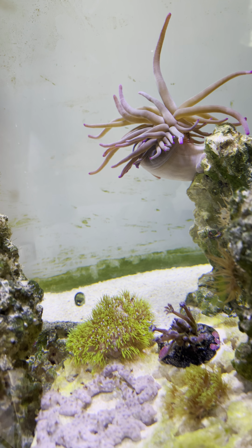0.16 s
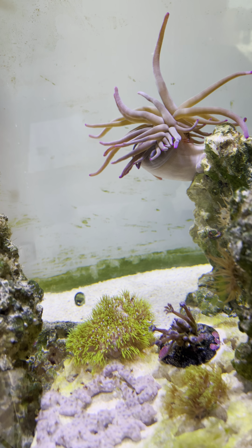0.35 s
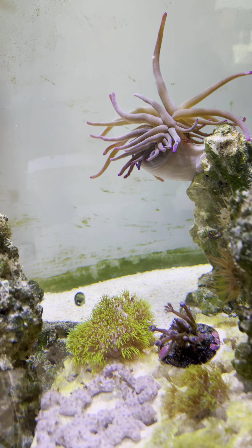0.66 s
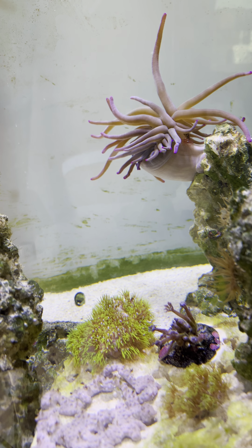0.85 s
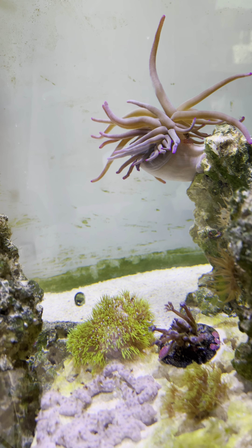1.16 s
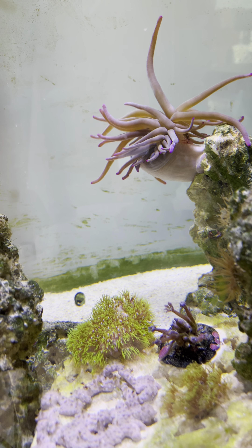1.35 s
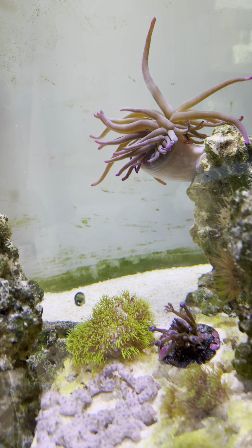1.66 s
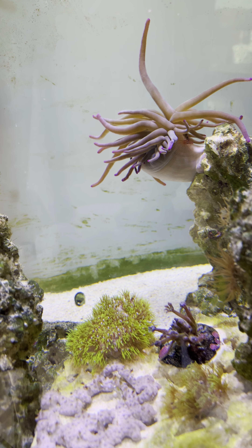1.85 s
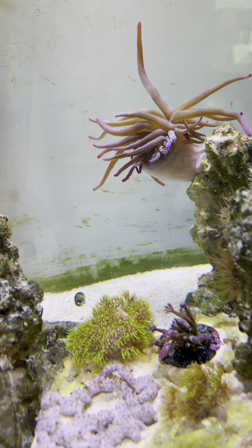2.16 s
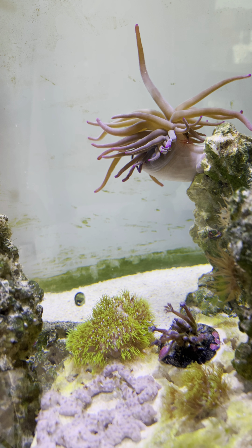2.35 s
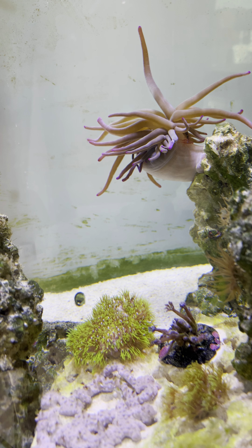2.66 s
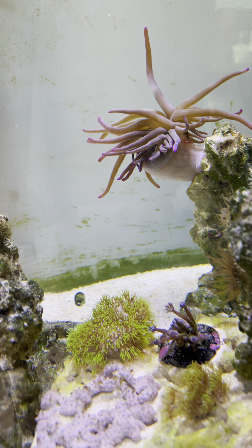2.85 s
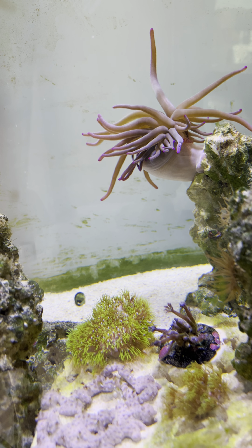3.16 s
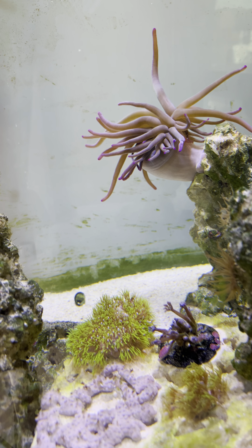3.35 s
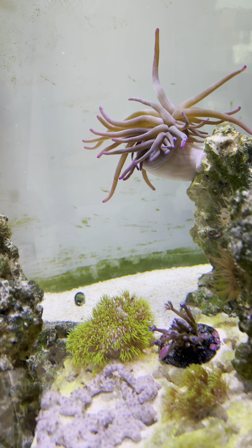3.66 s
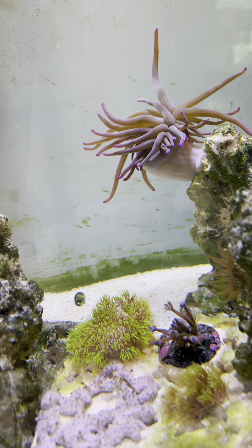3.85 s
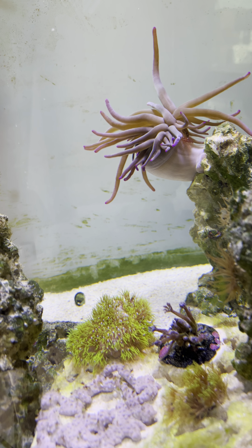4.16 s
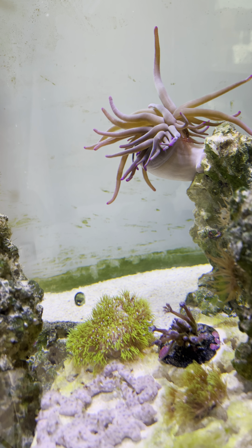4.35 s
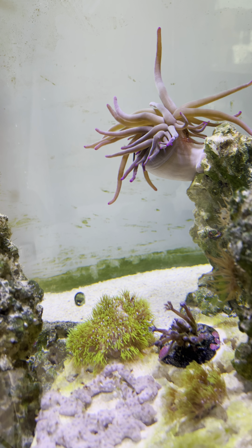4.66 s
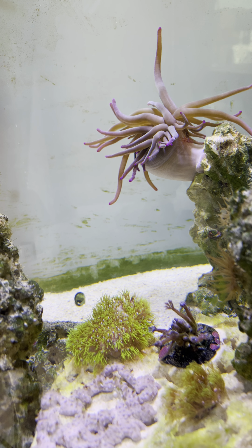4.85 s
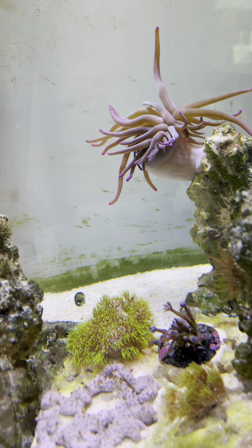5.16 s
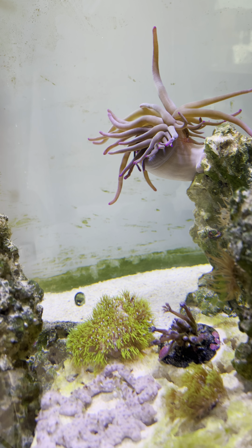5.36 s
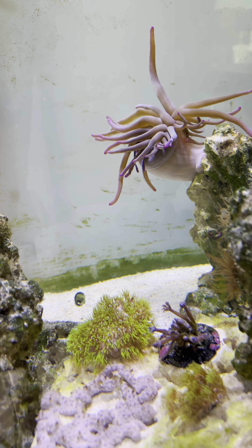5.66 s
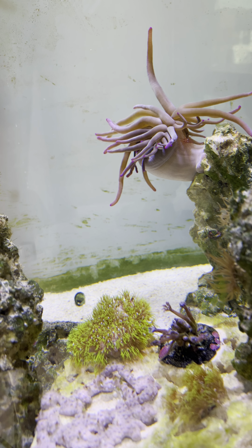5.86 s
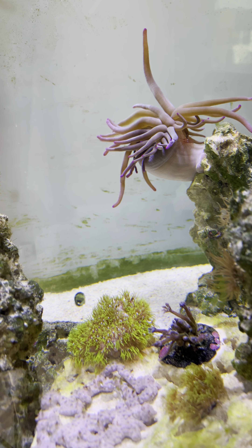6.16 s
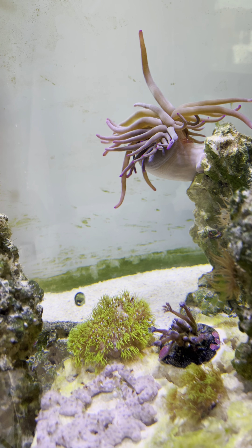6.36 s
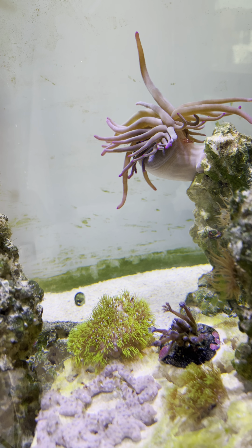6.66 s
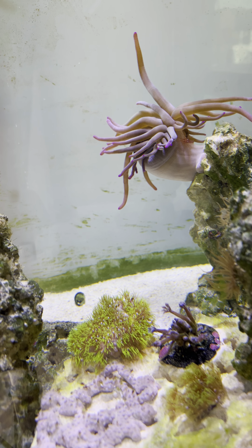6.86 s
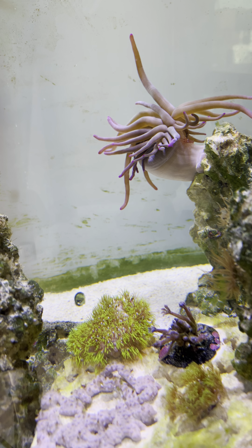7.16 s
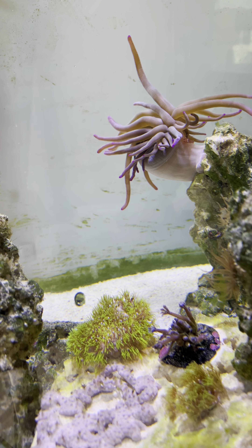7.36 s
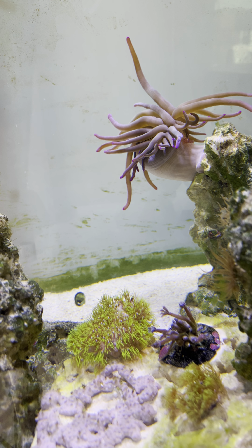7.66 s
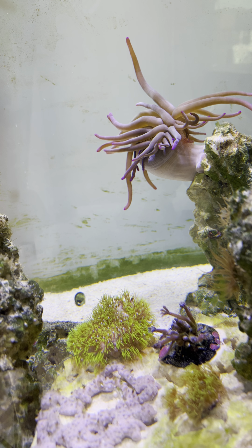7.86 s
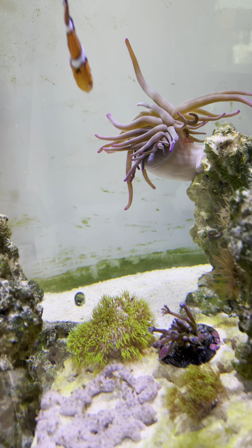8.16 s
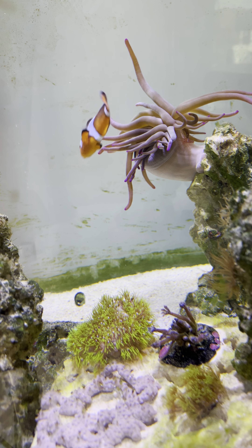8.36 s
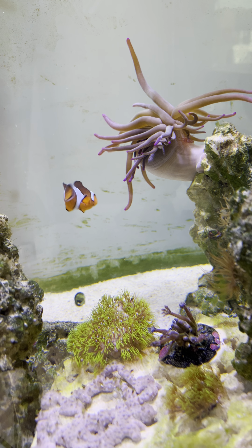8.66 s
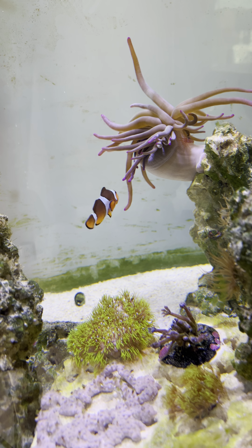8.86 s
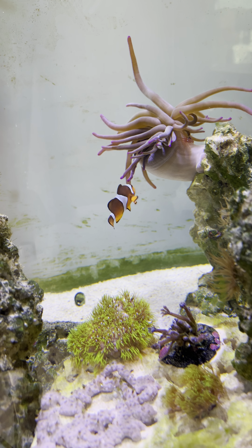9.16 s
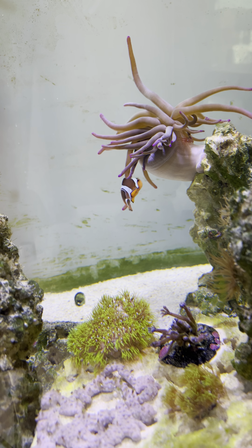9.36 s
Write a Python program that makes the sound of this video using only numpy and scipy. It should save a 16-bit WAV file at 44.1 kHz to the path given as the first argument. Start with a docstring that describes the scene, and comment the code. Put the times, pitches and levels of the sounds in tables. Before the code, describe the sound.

A home aquarium is heard close to the glass in a small room. For the whole stretch of nearly ten seconds, a pump gives a steady low hum over softly churning water, while the return flow trickles with tiny high bubbles and a faint fizz. A quiet, deep drone climbs in pitch and fades within the first two seconds. Sleeves rustle softly on and off, with a faint thin squeak at 0.8 seconds. Light clicks come at about 1.2, 2.2 and 3.6 seconds, the middle one duller. At 5 seconds the cabinet takes one dull thump, the loudest event, and its panels ring low for about half a second. From around 7 seconds the sleeves stir again in soft swishes, and a small, lower bubble plips near 8.3 seconds. The hum and trickle continue to the end.

```python
"""A home aquarium, close to the glass. From the outset the pump hums at twice the mains frequency and
churns the water, while the return flow trickles with tiny ringing bubbles. A low drone climbs and fades
in the first seconds. Sleeves rustle on and off as cloth slides on cloth, with a thin squeak at 0.8 s
and a few light clicks in the small room. At 5 s the cabinet takes one dull thump and its panels ring;
from about 7 s the sleeves stir again over the hum and the water."""
import sys
import numpy as np
from scipy import signal
from scipy.fft import rfft, irfft
from scipy.io import wavfile
from scipy.ndimage import uniform_filter1d

SR = 44100
rng = np.random.default_rng(int(sys.argv[2]) if len(sys.argv) > 2 else 0)


def transcribe(u):
    """Save the signal u as a 16-bit wav file named by the first command-line argument.

    u: samples, shape (n,) or (channels, n), limited to [-1, 1]; the rate is SR.
    q: integer samples, one column per channel.
    """
    v = np.clip(np.atleast_2d(u).T, -1, 1)
    q = np.round(v * 32767).astype(np.int16)
    wavfile.write(sys.argv[1], SR, q)


N = 419391
T = np.arange(N) / SR
FREQ = np.maximum(np.arange(N // 2 + 1) * SR / N, 1)

# stereo image: f/Hz, correlation, left phase lag/rad
STEREO_IMAGE = [(120, .999, 0), (250, .95, 0), (450, .5, 0), (800, .33, 0), (1700, .55, 0), (2800, .25, .4),
                (4500, .3, .2), (5800, .6, 1.1), (7500, .68, .9), (9000, .9, 1.2), (12000, .82, 1.3),
                (15500, .82, 1.55)]
# tone of the cloth hiss: f/Hz, relative level/dB
CLOTH_EQ = [(400, -25), (1200, -6), (2600, 1.5), (3800, 0), (5300, -1.5), (6600, 1), (9000, -2),
            (10300, -5), (12000, -22.5), (15500, -11.5)]
# short swells of hiss, mostly cloth strokes, plus a click's bright tail and a brief burst at the very end: #
# start t/s, length/s, relative level/dB
HISS_SWELLS = [(0.241, 0.031, -55.5), (0.89, 0.11, -55.5), (1.096, .2, -59.5), (1.207, 0.24, -57),
               (1.75, .2, -63), (1.95, .05, -53.5), (1.99, 0.33, -55), (2.206, .12, -54.5), (2.3, .2, -63),
               (2.69, 0.37, -60), (3.32, .3, -60), (3.531, 0.13, -53.5), (3.644, 0.066, -46.5),
               (4.08, 0.17, -58), (4.325, 0.11, -63), (4.674, 0.085, -50.5), (4.88, .3, -65),
               (5.02, 0.04, -52), (6.935, .08, -61.5), (6.9, 0.66, -69), (7.443, 0.31, -51.5),
               (7.65, 0.19, -55), (8.03, .36, -64.5), (8.427, 0.18, -59.5), (8.636, 0.15, -56.5),
               (8.974, .2, -57.5), (9.2, 0.13, -63), (9.464, 0.13, -56.5)]
# stretches of faint shifting between strokes: start t/s, end t/s
RESTLESS_SPANS = [(.85, 4.47), (7.4, 8.85)]
# duller brushes of cloth: centre t/s, length/s, level/dB, low f/Hz, high f/Hz
DULL_BRUSHES = [(0.98, 0.027, -55, 700, 3800), (2.066, 0.082, -60, 1300, 3800),
                (2.266, 0.38, -57, 650, 3300), (2.866, 0.28, -61, 800, 3500), (3.544, 0.3, -64, 1500, 4200),
                (7.563, 0.19, -65, 2200, 4500), (8.191, 0.07, -58.5, 2390, 4570),
                (8.213, .06, -58, 450, 1050), (8.313, 0.13, -56, 550, 2630)]
# resonances of the squeak: f/Hz, width/Hz, relative level/dB
SQUEAK_PEAKS = [(6400, 310, -5.5), (7040, 250, -5), (8000, 300, -9), (8760, 220, 1.5), (13600, 700, -16),
                (15100, 830, -19)]
# light contacts, and the sharp onset of the cabinet thump near 5.03 s: t/s, relative level/dB, low f/Hz, # high
# f/Hz, burst length/s, room send/dB
CLICK_CUES = [(.392, -60, 2500, 7500, .018, -7), (.475, -58.5, 1210, 4970, .025, 2),
              (.974, -57, 756, 3000, .012, -6), (1.2312, -34.5, 2060, 15500, 0.0052, -0.5),
              (1.237, -41.5, 5480, 10500, 0.022, -6), (1.236, -48.5, 2000, 3020, 0.037, -3),
              (2.196, -40, 690, 2020, 0.019, -2), (2.2115, -42, 700, 1800, 0.01, -14),
              (3.649, -38.5, 7350, 10100, 0.013, 2), (3.653, -42, 3270, 9600, 0.05, -4.5),
              (3.654, -45, 650, 1030, 0.034, 2.5), (3.664, -47, 2630, 4400, 0.028, 2.5),
              (5.029, -35.5, 440, 763, 0.024, 1.5), (5.0287, -40.5, 700, 1920, 0.0098, 2.5),
              (5.041, -41.5, 856, 1340, 0.011, 1.5), (5.04, -58, 1600, 7300, 0.041, -6)]
# cabinet modes under a blow: f/Hz, relative level/dB, t60/s
PANEL_MODES = [(69.7, -9, 0.67), (88, -17, 0.62), (124, -12, 0.22), (143.6, 4.5, 0.29), (154.6, 6, 0.2),
               (203, -6, 0.48), (264, -7.5, 0.25), (280, -13, 0.29), (353.5, -13.5, 0.23),
               (374, -11.5, 0.2), (535, -21, 0.21), (650, -21, 0.18)]
# low body of the churning water: f/Hz, density/(dB per Hz)
CHURN_EQ = [(20, -101), (35, -74.5), (60, -64.5), (78, -66), (96, -75.5), (140, -66.5), (175, -73),
            (230, -79), (275, -70), (370, -78), (700, -83.5), (820, -90), (1300, -100), (3000, -125)]
# cabinet resonances that colour the churn: f/Hz, width/Hz, boost/dB
CABINET_PEAKS = [(294, 35, 3.5), (465.2, 8.3, 10.5)]
# airy wash of the return flow: f/Hz, density/(dB per Hz)
WASH_EQ = [(300, -110), (1100, -93), (1800, -100), (2700, -97), (3600, -106), (6100, -108.3),
           (7200, -114.5), (9200, -113), (10200, -124), (12000, -136), (15700, -133)]
# outlet resonances that colour the wash: f/Hz, width/Hz, boost/dB
OUTLET_PEAKS = [(4400, 170, 8), (5720, 280, 4.5), (8100, 300, 2.5), (8720, 200, 5.5)]
# bubbles that ring out clearly: t/s, level/dB, starting f/Hz, t60/s
SOLO_BUBBLES = [(.3152, -47.5, 4900, 0.018), (0.48, -51.5, 8960, 0.026), (1.428, -54, 3050, .03),
                (1.72, -56, 3040, .025), (1.8377, -51, 7470, 0.056), (2.6757, -49.5, 9170, 0.014),
                (3.8666, -58, 5470, .018), (3.904, -55, 8440, .015), (5.2754, -59, 4170, .03),
                (5.3413, -53, 5430, .014), (5.6213, -50.5, 5770, 0.026), (5.868, -57, 9200, .012),
                (5.915, -56, 3150, .025), (6.226, -49.5, 1184, .08), (6.245, -58, 8800, 0.011),
                (8.205, -53, 890, 0.14), (8.355, -44, 610, 0.13), (9.096, -53, 2810, 0.033),
                (9.21, -56, 8000, .015)]
# partials of the hum: multiple of the mains frequency, relative level/dB
PUMP_HARMONICS = [(1, -37.5), (2, 1.5), (3, -21), (5, -26), (6, -29), (7, -33), (8, -45), (9, -43.5),
                  (10, -42.5), (11, -39), (12, -38), (14, -53), (15, -52.5)]


def undb(db):
    """Decibels to gain."""
    return 10 ** (np.asarray(db) / 20)


def unit(x):
    """Scale to rms 1."""
    return x / np.sqrt(np.mean(x ** 2))


def spectrum(points):
    """Join (f/Hz, value) points on a log-frequency axis."""
    hz, value = np.transpose(points)
    return np.interp(np.log(FREQ), np.log(hz), value)


def bell(hz, width):
    """The curve of one resonance, 1 at its centre."""
    return 1 / (1 + (2 * (FREQ - hz) / width) ** 2)


def boosts(peaks):
    """The lift in dB that resonances give to a spectrum."""
    return sum(db * bell(hz, width) for hz, width, db in peaks)


def ripple(step_hz=55):
    """Narrow peaks and dips from echoes off glass and walls; spread near 1."""
    heights = rng.standard_normal(1000)
    return np.interp(FREQ, step_hz * np.arange(len(heights)), heights)


def noise(db):
    """Stereo noise of a given density (dB per Hz), almost mono in the bass."""
    correlation = spectrum(np.array(STEREO_IMAGE)[:, :2])
    mid, side = rfft(rng.standard_normal((2, N))) * np.sqrt([1 + correlation, 1 - correlation])
    return irfft(np.array([mid + side, mid - side]) * undb(db), N) * np.sqrt(SR) / 2


def wander(rate_hz):
    """A smooth random modulator of rms 1."""
    hold = int(SR / rate_hz)
    steps = rng.standard_normal(N // 100)[np.arange(N) // hold]
    return unit(uniform_filter1d(uniform_filter1d(steps, hold), hold))


def band(x, low_hz, high_hz, order=2):
    """Causal band-pass."""
    return signal.sosfilt(signal.butter(order, [low_hz, high_hz], "band", fs=SR, output="sos"), x)


def add(track, s, sound):
    """Mix a sound into a track at a time."""
    i = int(s * SR)
    track[i:i + len(sound)] += sound[:N - i]


def fade(t60):
    """An exponential decay down to -60 dB."""
    return np.exp(-np.log(1000) * np.arange(int(t60 * SR) + 2) / (t60 * SR))


def swell(centre_s, length_s):
    """A soft, symmetric rise and fall."""
    return np.exp(-(2 * (T - centre_s) / length_s) ** 2)


def room(x, t60=0.34, predelay_s=0.0023, spread=0.98):
    """Diffuse stereo tail of a small room."""
    decay = fade(t60)
    mid, side = rng.standard_normal((2, 2 * SR))[:, :len(decay)] * decay * (T[:len(decay)] > predelay_s)
    tails = np.array([mid + spread * side, mid - spread * side])
    return signal.fftconvolve(x[None], tails / np.sqrt(np.sum(tails ** 2) / 2), axes=1)[:, :N]


def drone(start_hz=38, climb_hz_per_s=13.5, db=-39, attack_s=0.39, fade_db_per_s=17):
    """A deep tone that swells, then fades as its pitch keeps climbing."""
    hz = start_hz + climb_hz_per_s * T
    envelope = np.minimum(T / attack_s, 1) * undb(db - fade_db_per_s * np.maximum(T - attack_s, 0))
    return np.sqrt(2) * envelope * np.sin(2 * np.pi * np.cumsum(hz) / SR)


def hiss_envelope(attack_share=0.2, release_share=0.51, room_t60=0.34, restless_db=-66.5, still_db=-86.5):
    """Hiss level in dB: swells rise, hold, fall and linger in the room, over faint shifting of cloth."""
    restless = sum((T > start) & (T < end) for start, end in RESTLESS_SPANS)
    power = undb(still_db) ** 2 + restless * undb(restless_db + 2 * wander(7)) ** 2
    for start, length, db in HISS_SWELLS:
        along = (T - start) / length
        shape = np.clip(np.minimum(along / attack_share, (1 - along) / release_share), 0, 1)
        power += (undb(db) * shape) ** 2
    feedback = np.exp(-2 * np.log(1000) / (room_t60 * SR))
    return 10 * np.log10(signal.lfilter([1 - feedback], [1, -feedback], power))


def rustle(trim_db=-2.3, grain_db=0.9, catch_db=0.9, bright_db=-54, shelf_hz=10500, stick_db=-76):
    """Mostly sleeves, cloth on cloth; fibres catch in tiny grains, and louder swells are brighter."""
    level_db = hiss_envelope()
    hiss = unit(noise(spectrum(CLOTH_EQ) + ripple()))
    air = irfft(rfft(hiss) / (1 + (shelf_hz / FREQ) ** 8), N)
    air_gain = undb(np.minimum(level_db - bright_db, 0))
    slipping = 1 / (1 + undb(2 * (stick_db - level_db)))  # at rest the cloth sticks and goes quiet
    swishes = (hiss - air + air * air_gain) * undb(level_db + trim_db) * slipping
    pink = noise(-10 * np.log10(FREQ))
    for s, length, db, low_hz, high_hz in DULL_BRUSHES:
        swishes += undb(db) * swell(s, length) * unit(band(pink, low_hz, high_hz))
    return swishes * undb(grain_db * wander(300) + catch_db * wander(30))


def squeak(at_s=0.828, length_s=0.046, db=-55):
    """A short, thin squeak: narrow resonances rubbed into sound."""
    gain = sum(undb(peak_db) * bell(hz, width) for hz, width, peak_db in SQUEAK_PEAKS)
    return unit(noise(20 * np.log10(gain))) * undb(db) * swell(at_s, length_s)


def clicks():
    """Light contacts, and the sharp onset of the thump: each a tight burst, answered by the room."""
    direct, send = np.zeros((2, N))
    for s, db, low_hz, high_hz, length, send_db in CLICK_CUES:
        decay = fade(length)
        crack = rfft(rng.standard_normal(SR)[:len(decay)] * decay)
        # a contact excites all frequencies alike; the struck thing sets the band
        flat = irfft(crack / np.abs(crack), len(decay)) * np.sqrt(decay)
        burst = band(np.pad(flat, (0, SR // 50)), low_hz, high_hz, order=3)
        burst *= 2 * undb(db) * np.sqrt(np.sum(decay ** 2) / np.sum(burst ** 2))
        add(direct, s, burst)
        add(send, s, burst * undb(send_db))
    return direct + room(send, t60=0.21)


def thump(at_s=5.034, db=-16, attack_s=0.025, rattle_db=-38, rattle_t60=0.23, room_db=-18):
    """A soft blow on the cabinet: its panels swell into their modes and rattle briefly."""
    hit = np.zeros(N)
    for hz, mode_db, t60 in PANEL_MODES:
        decay = fade(t60)
        t = T[:len(decay)]
        envelope = undb(db + mode_db) * decay * np.minimum(t / attack_s, 1)
        add(hit, at_s, envelope * np.sin(2 * np.pi * hz * t))
    rattle = unit(band(rng.standard_normal(N), low_hz=199, high_hz=650))
    decay = fade(rattle_t60)
    add(hit, at_s, undb(rattle_db) * decay * rattle[:len(decay)])
    return hit + undb(room_db) * room(hit, spread=0.21)


def flow(surge_db=0.16, flicker_db=0.86):
    """Water churns in the tank and washes out of the outlet, never quite evenly."""
    churn = noise(spectrum(CHURN_EQ) + boosts(CABINET_PEAKS)) * undb(surge_db * wander(10))
    echo_colour_db = 2 * np.minimum(FREQ / 3500, 1) * ripple()
    wash = noise(spectrum(WASH_EQ) + boosts(OUTLET_PEAKS) + echo_colour_db)
    return churn + wash * undb(flicker_db * wander(16))


def bubble(hz, t60, rise=0.044):
    """A bubble rings and climbs in pitch as it nears the surface."""
    decay = fade(t60)
    glide_hz = hz * (1 + rise * np.linspace(0, 1, len(decay)))
    return decay * np.sin(2 * np.pi * np.cumsum(glide_hz) / SR)


def swarm(count, floor_db, scatter_db, low_hz, high_hz, cycles):
    """Bubbles at random moments: most are faint, a few stand out."""
    bubbles = np.zeros(N)
    for when, pitch, chance in rng.random((count, 3)):
        hz = low_hz * (high_hz / low_hz) ** pitch
        db = floor_db + scatter_db * min(-np.log(chance), 3)
        add(bubbles, when * N / SR, undb(db) * bubble(hz, cycles / hz))
    return bubbles


def trickle(room_db=-6):
    """Bubbles plip at the surface, the finest foam bursts with a fizz, and a few ring clearly."""
    plips = swarm(count=520, floor_db=-67.5, scatter_db=2.9, low_hz=1000, high_hz=6500, cycles=55)
    fizz = swarm(count=700, floor_db=-67.5, scatter_db=2.8, low_hz=6600, high_hz=9800, cycles=70)
    bubbles = plips + fizz
    for s, db, hz, t60 in SOLO_BUBBLES:
        add(bubbles, s, undb(db) * bubble(hz, t60))
    return bubbles + undb(room_db) * room(bubbles, t60=0.11)


def pump(mains_hz=59.985, db=-33.5, waver_db=4.0, early_boost_db=1.5, settle_s=1.9, ease_s=0.39):
    """A mains-locked motor: a firm second harmonic, and weak partials that waver with the load."""
    hum = np.zeros(N)
    for multiple, partial_db in PUMP_HARMONICS:
        waver = 1 if multiple == 2 else undb(-waver_db * wander(5.2))
        hum += undb(partial_db) * waver * np.sin(2 * np.pi * (multiple * mains_hz * T + rng.random()))
    early = 0.5 - 0.5 * np.tanh((T - settle_s) / (2 * ease_s))  # starts a touch louder, then eases down
    return hum * undb(db + early_boost_db * early)


def scene():
    """The stereo mix: hum and water, with the small sounds around the tank."""
    return pump() + flow() + trickle() + drone() + rustle() + squeak() + clicks() + thump()


def record(dry):
    """The treble is shifted in phase on the left, so it leans slightly right; a high cut trims the top."""
    lag_rad = spectrum(np.array(STEREO_IMAGE)[:, ::2])
    left = irfft(rfft(dry[0]) * np.exp(-1j * lag_rad), N)
    high_cut = signal.ellip(10, 0.2, 80, 15750, fs=SR, output="sos")
    return signal.sosfilt(high_cut, np.array([left, dry[1]]))


dry = scene()
out = record(dry)
transcribe(out)
```